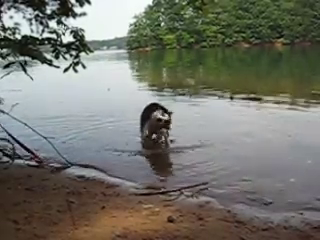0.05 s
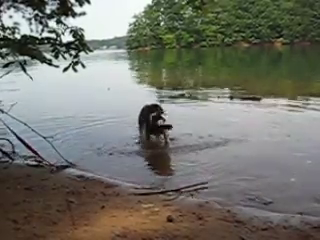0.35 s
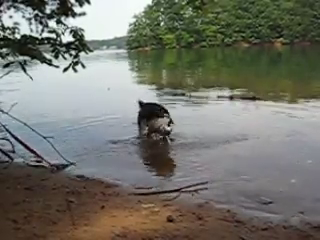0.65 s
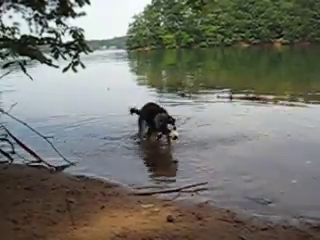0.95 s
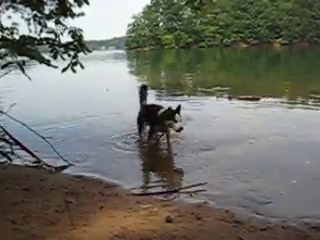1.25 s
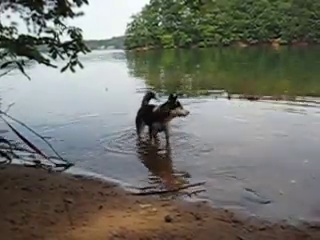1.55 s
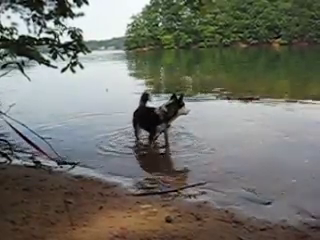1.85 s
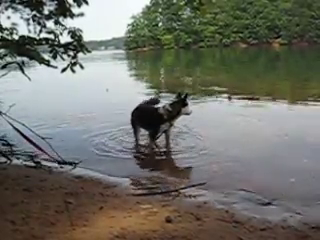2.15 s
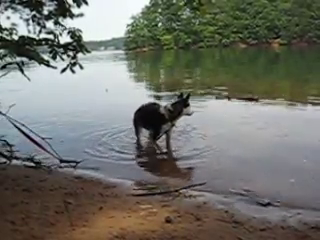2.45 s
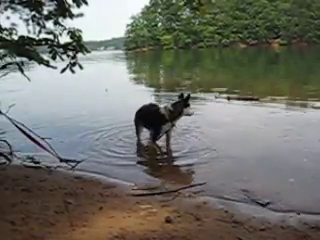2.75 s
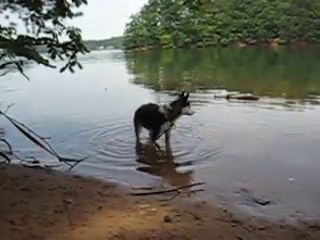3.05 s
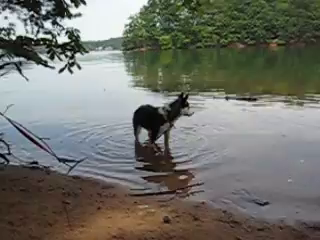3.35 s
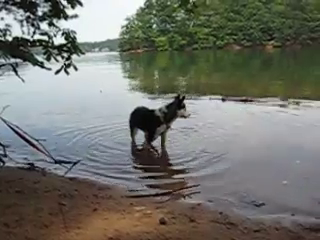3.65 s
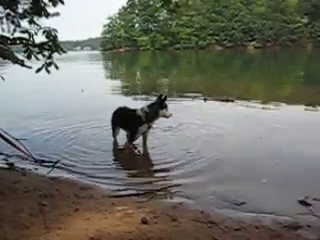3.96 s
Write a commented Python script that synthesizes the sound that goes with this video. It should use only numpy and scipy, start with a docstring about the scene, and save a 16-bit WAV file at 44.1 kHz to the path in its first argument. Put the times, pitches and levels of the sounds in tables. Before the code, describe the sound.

A dog shakes off water with clinking collar tags, wet slaps of fur and pattering spray. After a small splash, the lakeside goes quiet, leaving soft drips, a gentle swish and two faint, distant bird whistles.

```python
"""A wet dog shakes itself in the shallows of a lake, over a faint outdoor hiss. For the first second
its collar rattles, its tags clash and ring, wet ears and fur slap, and spray patters on the water.
Then a paw comes down with a splash of bubbles. The coat drips on, each drop ringing a tiny bubble
or landing with a splat. Around two seconds the water swishes softly, then a far bird whistles twice,
and the last drops fall as the hiss grows duller."""
import sys
import numpy as np
from scipy import signal
from scipy.fft import rfft, irfft
from scipy.io import wavfile

SR = 44100
rng = np.random.default_rng(int(sys.argv[2]) if len(sys.argv) > 2 else 0)


def output_pcm(signal):
    """Save a mono or channel-first signal as 16-bit PCM at the path in sys.argv[1].

    Samples are clipped to [-1, 1] before scaling.
    """
    pcm = np.clip(np.atleast_2d(signal).T, -1, 1) * 32767
    wavfile.write(sys.argv[1], SR, np.round(pcm).astype(np.int16))


N = 176400
TIME = np.arange(N) / SR
AGE = TIME[:SR // 4]   # seconds since a short sound began

# A "tone" says how strong low and high pitches are. A "fade" is the time taken to drop by 60 dB.
# steady outdoor noise: (pitch [Hz], level [dB])
AIR_TONE = [(15, -35), (25, -4), (130, 0.5), (220, -0.5), (1190, -0.8), (3340, -4.5), (9570, -10),
            (14800, -30), (16000, -16)]
# high hiss: (time [s], level before its top is cut [dB], highest pitch [Hz])
HISS_CURVE = [(0, -49, 15900), (2.05, -53.5, 15300), (2.4, -49.5, 12300), (2.75, -48.5, 9650),
              (2.95, -52, 7400), (4, -75, 7500)]
# that hiss: (pitch [Hz], level [dB])
HISS_TONE = [(5000, -7.5), (8000, -5), (16000, -1.5)]
# spray falling on the lake: (time [s], level [dB])
SPRAY_CURVE = [(0, -38), (.035, -64), (.06, -40), (.33, -43), (.39, -38.5), (.49, -31.5), (.585, -43),
               (.82, -36), (.99, -40.5), (1.09, -32.5), (1.14, -37), (1.18, -41.5), (1.35, -46.5),
               (1.8, -54), (4, -56.5)]
# its patter: (pitch [Hz], level [dB])
SPRAY_TONE = [(300, -22), (600, -7.5), (1000, -3), (4000, 4), (7000, 1.5), (10000, -3.5), (13000, 0.5),
              (16000, -9)]
# tags collide: (time [s], low ring [dB], high ring [dB], clack before its boost [dB], ring fade [s])
TAG_HITS = [(.0115, -32, -47, -30, 0.099), (0.0435, -43, -37, -22.5, .03), (0.05, -40, -13, -19, .02),
            (0.0545, -37, -23, -16, 0.018), (.0695, -38, -35, -19, .03), (0.0764, -16.5, -5, -24, 0.057),
            (.0790, -17, -17, -26, 0.069), (.0925, -27, -26, -23, 0.2), (0.132, -44, -23, -20.5, 0.059),
            (.1717, -49, -10.5, -27, 0.024), (0.2218, -44, -12, -21, 0.033), (0.2395, -23, -39, -33, 0.049),
            (.2511, -37, -33, -17, 0.018), (.2561, -29, -3, -15, 0.018), (0.2703, -28, -7, -18, 0.033),
            (0.302, -40, -13.5, -23, 0.064), (0.3804, -40, -20, -19.5, 0.054), (0.394, -22, -27, -11, 0.02),
            (0.4184, -17, -3.5, -19, 0.021), (0.4383, -22, -16, -15, 0.11), (.4762, -8, -32, -21, 0.0067),
            (0.49, -38, -15, -37, 0.015), (0.5076, -20.5, -46, -27, 0.27), (0.5284, -10.5, -5, -23, 0.051),
            (.5505, -35, -22, -22, .015), (.5558, -13.5, -8.5, -23, 0.065), (.5695, -33, -30, -26, .012),
            (0.572, -35.5, -23, -35, 0.021), (0.6338, -6, -8.5, -21, 0.082), (0.714, -8.5, -15, -38, 0.029),
            (0.7174, -11.5, -13, -27, 0.046), (0.7397, -18.5, -13.5, -44, 0.1),
            (0.7558, -21, -16, -18.5, 0.04), (.7606, -8.5, -17, -19, 0.077), (.7880, -27, -28, -44, 0.21),
            (.809, -19, -24, -27, 0.051), (0.8297, -12.5, -19.5, -16, 0.095), (.8460, -47, -38, -19.5, .05),
            (0.8622, -20.5, -19, -20, 0.11), (.9262, -14.5, -17, -24, 0.065),
            (.9329, -35, -11.5, -28, 0.044), (.9435, -22, -28, -34, .03), (0.9677, -17.5, -28, -22.5, .03)]
# the tags' lower notes: (pitch [Hz], relative level [dB])
LOW_NOTES = [(5160, -3), (5235, -19), (8980, -21.5)]
# their higher notes: (pitch [Hz], relative level [dB])
HIGH_NOTES = [(12130, -6), (12300, -12), (11150, -22), (15300, -24)]
# ring and buckle: (pitch [Hz], level [dB])
CLACK_TONE = [(2000, -17), (4500, 0.5), (6300, 3), (7600, -3), (10500, -1.5), (12300, 0), (16000, -20)]
# wet slaps of ears, fur and paws, and the soft splashes of later drops:
# (time [s], average level [dB], centre pitch [Hz], rise [s], fade [s])
SLAPS_AND_SPLASHES = [(0.054, -26, 2100, 0.0022, 0.027), (0.169, -41, 1030, 0.0075, 0.31),
                      (0.3, -35.5, 666, 0.0024, 0.077), (0.352, -28, 1090, 0.0057, 0.091),
                      (.356, -35, 3000, 0.0085, 0.071), (0.398, -36, 1460, 0.007, 0.078),
                      (0.418, -34.5, 1040, 0.02, 0.037), (0.465, -32, 1790, 0.0025, 0.12),
                      (0.477, -19, 3800, 0.004, 0.028), (.700, -36.5, 1510, 0.016, 0.2),
                      (1.043, -30, 1810, 0.0041, 0.049), (1.136, -37, 1260, 0.019, 0.19),
                      (1.649, -38.5, 1800, 0.0014, 0.1), (2.833, -40, 3940, 0.024, 0.23),
                      (2.984, -46.5, 1530, 0.024, 0.27)]
# knocks on the collar: (time [s], level [dB])
COLLAR_KNOCKS = [(.2562, -23), (0.2708, -20), (0.5281, -22), (0.634, -14.5)]
# each knock: (pitch [Hz], level [dB])
KNOCK_TONE, KNOCK_FADE_S = [(30, 0), (1500, 15.5), (2500, 6), (6000, 11)], 0.0067
# drops that trap a bubble: (time [s], peak level [dB], starting pitch [Hz], fade [s])
BUBBLE_DROPS = [(0.301, -26.5, 3780, 0.078), (0.354, -23, 730, 0.042), (0.4429, -22.5, 2070, 0.031),
                (0.586, -23, 3870, 0.036), (.804, -26, 1790, .03), (.852, -35, 700, 0.1),
                (0.8758, -18, 2730, 0.011), (.882, -25.5, 3360, 0.021), (0.979, -44, 433, 0.1),
                (1.028, -25, 2700, 0.017), (1.042, -30.5, 765, 0.22), (1.055, -28, 2110, 0.029),
                (1.085, -38, 590, 0.07), (1.302, -35, 8350, 0.047), (1.543, -36, 3600, 0.022),
                (1.658, -39.5, 1224, 0.046), (2.956, -31.5, 4120, 0.009), (2.957, -42, 610, 0.052),
                (2.970, -36.5, 5670, .016), (2.978, -37.5, 1250, 0.07), (3.005, -37, 1590, 0.032),
                (3.038, -45.5, 1365, .06), (3.085, -40.5, 1390, 0.032), (3.158, -36.5, 3730, .015),
                (3.315, -35.5, 3650, 0.0082)]
# the paw's splash: (time [s], level [dB])
PLUNGE_CURVE = [(.92, -47), (.99, -48.5), (1.04, -35.5), (1.09, -38), (1.135, -38), (1.18, -49.5),
                (1.35, -52.5)]
# its bubbles: (pitch [Hz], level [dB])
PLUNGE_TONE = [(120, -32), (300, -1), (480, 2), (780, -0.5), (2500, -5.5), (6000, -4.5), (14000, -48)]
# drops that splat: (time [s], level [dB], fade [s])
SPLAT_DROPS = [(1.389, -34, 0.012), (1.454, -39, 0.035), (1.998, -37, 0.04), (2.477, -43, .04),
               (2.832, -25, 0.017), (3.183, -46, .01), (3.345, -44, .012)]
# each splat: (pitch [Hz], level [dB])
SPLAT_TONE = [(200, -17), (600, 8), (2000, 2.5), (4500, 9), (8000, 6), (13000, 0.5), (16000, -16)]
# swishing water: (time [s], hiss level [dB], note level [dB], note pitch [Hz])
SWISH_CURVE = [(1.89, -67, -53.5, 540), (2.03, -51.5, -50, 691), (2.16, -44.5, -50.5, 798),
               (2.22, -49, -89, 860), (2.32, -63, -80, 850)]
# its hiss: (pitch [Hz], level [dB])
SWISH_TONE, NOTE_WIDTH_HZ = [(400, -23), (1200, -2), (4000, 0), (8000, -5), (15000, -27)], 200
# bird calls: (time [s], length [s], peak level [dB], starting pitch [Hz], final pitch [Hz])
BIRD_CALLS = [(2.368, .095, -57.5, 2460, 3360), (2.658, 0.12, -56, 2390, 2680)]


def from_db(db):
    """Turn decibels into a number to multiply by."""
    return np.exp(np.asarray(db) * (np.log(10) / 20))


def rms_one(x):
    """Scale a sound to an average power of 1."""
    return x / np.sqrt(np.mean(x ** 2) + 1e-20)


def in_time(rows):
    """Join a curve's points with straight lines, column by column."""
    s, *columns = np.transpose(rows)
    return [np.interp(TIME, s, c) for c in columns]


def during(rows):
    """1 from the first to the last point of a curve, else 0."""
    return (TIME >= rows[0][0]) & (TIME <= rows[-1][0])


def dying(fade_s):
    """Start at 1 and drop by 60 dB every fade_s seconds."""
    return from_db(-60 * AGE / fade_s)


def add(out, s, sound):
    """Mix a sound in at s seconds."""
    i = int(s * SR)
    piece = sound[max(-i, 0):N - i]
    out[max(i, 0):max(i, 0) + len(piece)] += piece


def coloured(x, tone):
    """Shape a sound with a tone table, falling away beyond its ends; power 1."""
    hz, db = np.transpose(tone)
    log_hz = np.log(np.maximum(np.fft.rfftfreq(len(x), 1 / SR), 1))
    outside = np.abs(log_hz - np.clip(log_hz, np.log(hz[0]), np.log(hz[-1])))
    gain = from_db(np.interp(log_hz, np.log(hz), db)) * np.exp(-2 * outside)
    return rms_one(irfft(rfft(x) * gain, len(x)))


def noise(tone, size=N):
    """Noise with a given tone."""
    return coloured(rng.standard_normal(size), tone)


def pings(per_s, cycles, low_hz, high_hz):
    """Many tiny pings of random size and pitch, each fading over `cycles` vibrations."""
    out, pitches = np.zeros(N), np.geomspace(low_hz, high_hz, 24)
    size_db = 3.5 * np.minimum(rng.exponential(1, N), 4)
    clicks = from_db(size_db) * rng.choice([-1, 1], N) * (rng.random(N) < per_s / SR)
    shares = np.cumsum(np.sqrt(pitches)) / np.sqrt(pitches).sum()   # high pitches get more clicks
    chosen = np.searchsorted(shares, rng.random(N))
    for k, hz in enumerate(pitches):
        decay, turn = 1000 ** (-hz / (cycles * SR)), 2 * np.pi * hz / SR   # per sample
        feedback = decay * np.cos(turn)
        ringing = signal.lfilter([1, -feedback], [1, -2 * feedback, decay ** 2],
                                 clicks * (chosen == k) + 1e-18)
        out += np.sqrt(hz) * rms_one(ringing)
    return rms_one(out)


def air(steady_db=-50):
    """Steady outdoor noise, and a high hiss that dulls and fades."""
    db, edge_hz = in_time(HISS_CURVE)
    spectrum, hz = rfft(noise(HISS_TONE)), np.fft.rfftfreq(N, 1 / SR)
    hiss = np.zeros(N)
    for low_hz in range(0, 16000, 1000):
        band = irfft(spectrum * (hz // 1000 == low_hz // 1000), N)
        hiss += band * np.clip((edge_hz - low_hz) / 1000, 0, 1)
    return from_db(steady_db) * noise(AIR_TONE) + from_db(db) * hiss


def spray(mist_db=-3.5):
    """Droplets thrown off the coat patter on the lake within a finer mist."""
    patter = pings(per_s=2400, cycles=20, low_hz=500, high_hz=15500)
    mist = from_db(mist_db) * rng.standard_normal(N)
    return from_db(in_time(SPRAY_CURVE)[0]) * coloured(patter + mist, SPRAY_TONE)


def rattle(level_db=-42, end_s=0.94, dying_down_s=0.62):
    """The collar's links tick lightly, dying down as the shake ends."""
    shaking = np.clip((end_s - TIME) / dying_down_s, 0, 1)
    return from_db(level_db) * shaking * pings(per_s=300, cycles=39, low_hz=5300, high_hz=14000)


def tags(touches_per_s=300, jolt_db=5.5, ring_db=-4.5, clack_boost_db=6):
    """Tags clang as they collide, then ring on; each light touch jolts their loudness and pitch."""
    out = np.zeros(N)
    rise = 1 - np.exp(-AGE / 0.00039)
    clang = dying(fade_s=0.0055)   # most of a blow dies while the tags touch
    for s, low_db, high_db, clack_db, fade_s in TAG_HITS:
        sound = from_db(clack_db + clack_boost_db) * clack()
        touch = np.cumsum(rng.random(len(AGE)) < touches_per_s / SR)   # touches so far
        for notes, hit_db, wander_hz in ((LOW_NOTES, low_db, 34.5), (HIGH_NOTES, high_db, 141)):
            jolt = (2 * rng.random(len(AGE)) - 0.5)[touch] * (touch > 0)
            ring = from_db(ring_db + jolt_db * jolt) * dying(fade_s)
            for hz, db in notes:
                pitch = hz + wander_hz * rng.standard_normal(len(AGE))[touch]
                wave = np.sin(2 * np.pi * (rng.random() + np.cumsum(pitch) / SR))
                sound += from_db(hit_db + db + rng.normal()) * wave * (clang + ring)
        add(out, s, sound * rise)
    return out


def clack(count=28, tail_db=-16.5):
    """The tags' ring and buckle answer a blow with many short notes, different every time."""
    pitches = np.linspace(2000, 15500, count) + rng.uniform(-250, 250, count)
    gains = from_db(np.interp(pitches, *np.transpose(CLACK_TONE))) * rng.rayleigh(1, count)
    waves = np.sin(2 * np.pi * (pitches[:, None] * AGE[:len(AGE) // 2] + rng.random((count, 1))))
    chord = np.pad(rms_one(gains @ waves), (0, len(AGE) - waves.shape[1]))
    return chord * (dying(fade_s=0.0052) + from_db(tail_db) * dying(fade_s=0.056))


def slaps_and_splashes(width_octaves=0.57, fringe_db=-9.5):
    """Each wet slap or soft splash is a cluster of tiny bubbles around one pitch, swelling and dying."""
    out, hz = np.zeros(N), np.geomspace(250, 15000, 25)
    froth = pings(per_s=2200, cycles=7.6, low_hz=670, high_hz=12000)
    for s, db, centre_hz, rise_s, fade_s in SLAPS_AND_SPLASHES:
        swell = np.concatenate([np.exp(-AGE[::-1] / rise_s), dying(fade_s)])
        hump = np.exp(-.5 * (np.log2(hz / centre_hz) / width_octaves) ** 2)
        fringe = from_db(fringe_db) / (1 + hz / (2 * centre_hz))
        tone = np.c_[hz, 20 * np.log10(hump + fringe)]
        piece = np.roll(froth, rng.integers(N))[:len(swell)]
        cluster = swell * coloured(piece, tone)
        cluster *= np.linalg.norm(swell) / np.linalg.norm(cluster)
        add(out, s - AGE[-1], from_db(db) * cluster)   # start early to peak on time
    return out


def knocks():
    """The hardest blows knock the collar too, in a short burst of noise."""
    out = np.zeros(N)
    for s, db in COLLAR_KNOCKS:
        add(out, s, from_db(db) * noise(KNOCK_TONE, len(AGE)) * dying(KNOCK_FADE_S))
    return out


def drips(pitch_rise_per_s=2):
    """A drop either traps a bubble that rings with rising pitch, or bursts in a splat."""
    out = np.zeros(N)
    for s, db, hz, fade_s in BUBBLE_DROPS:
        bubble = np.sin(2 * np.pi * hz * AGE * (1 + pitch_rise_per_s * AGE / 2))
        add(out, s, from_db(db) * bubble * dying(fade_s))
    for s, db, fade_s in SPLAT_DROPS:
        add(out, s, from_db(db) * noise(SPLAT_TONE, len(AGE)) * dying(fade_s))
    return out


def plunge():
    """A paw drives larger, deeper-sounding bubbles into the water."""
    level = from_db(in_time(PLUNGE_CURVE)[0]) * during(PLUNGE_CURVE)
    bubbles = pings(per_s=1200, cycles=21, low_hz=280, high_hz=9000)
    return level * coloured(bubbles, PLUNGE_TONE)


def swish():
    """The water hisses softly while a hollow note glides up under it."""
    hiss_db, note_db, hz = in_time(SWISH_CURVE)
    smoothing = signal.butter(2, NOTE_WIDTH_HZ / 2, fs=SR, output="sos")
    waver = rms_one(signal.sosfilt(smoothing, rng.standard_normal(N)))
    note = from_db(note_db) * waver * np.sin(2 * np.pi * np.cumsum(hz) / SR)
    return during(SWISH_CURVE) * (from_db(hiss_db) * noise(SWISH_TONE) + note)


def bird():
    """A far bird gives faint whistles that bend upwards."""
    out = np.zeros(N)
    for s, length_s, db, start_hz, end_hz in BIRD_CALLS:
        progress = np.clip(AGE / length_s, 0, 1)
        swell = np.sqrt(np.abs(np.sin(np.pi * progress)))
        hz = start_hz + (end_hz - start_hz) * progress ** 3
        add(out, s, from_db(db) * swell * np.sin(2 * np.pi * np.cumsum(hz) / SR))
    return out


def scene():
    """Add up all the sounds, the same on the left and right."""
    collar = tags() + knocks() + rattle()
    water = slaps_and_splashes() + drips() + spray() + plunge() + swish()
    mono = collar + water + bird() + air()
    return np.stack([mono, mono])


def record(dry):
    """Steeply cut away the very highest pitches."""
    cutoff_hz = 15900
    return signal.sosfilt(signal.ellip(10, .1, 80, cutoff_hz, fs=SR, output="sos"), dry)


dry = scene()
out = record(dry)
output_pcm(out)
```